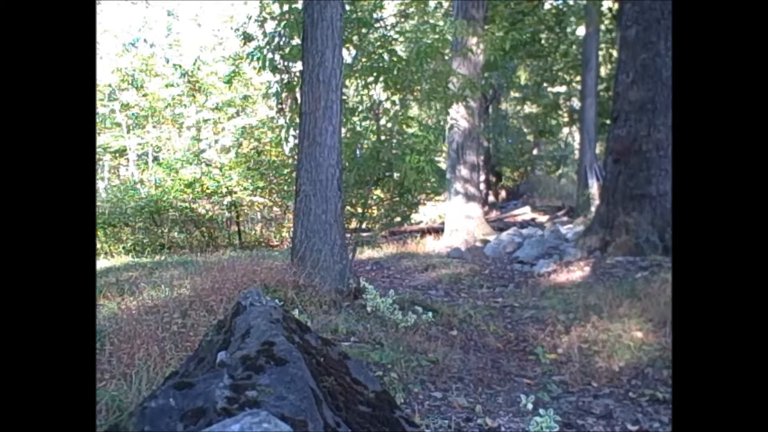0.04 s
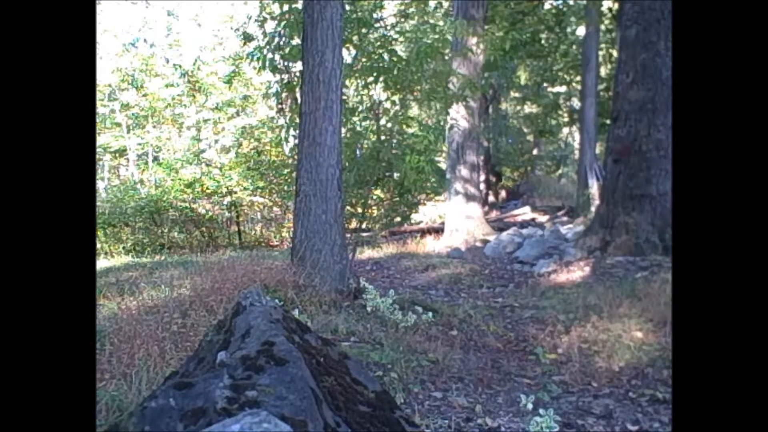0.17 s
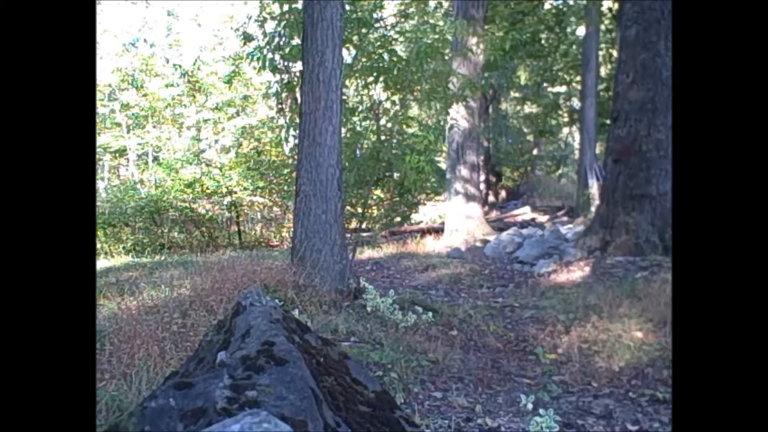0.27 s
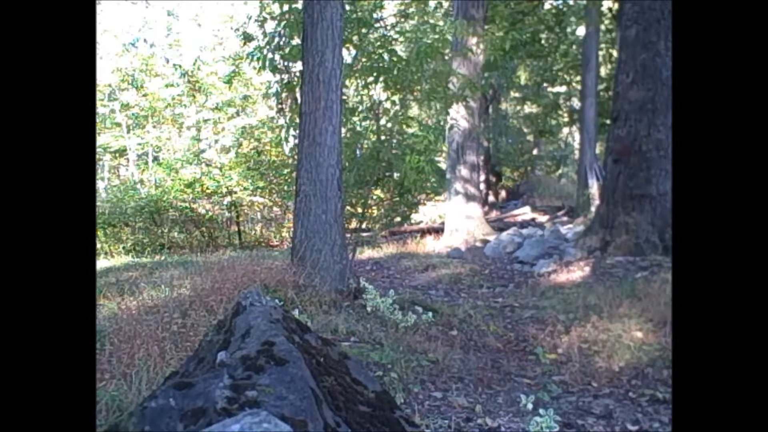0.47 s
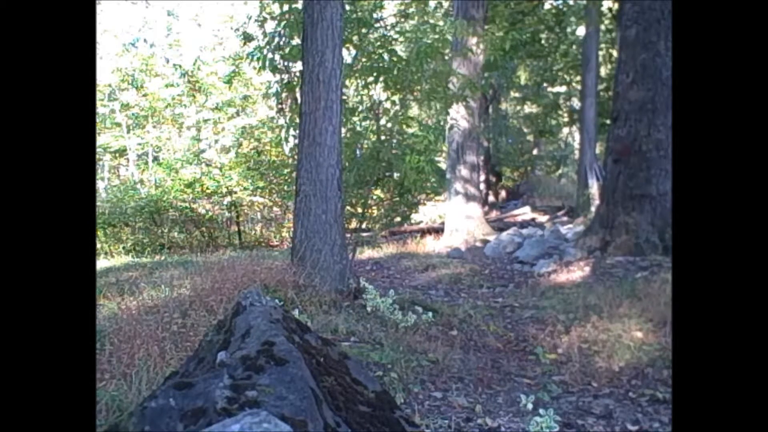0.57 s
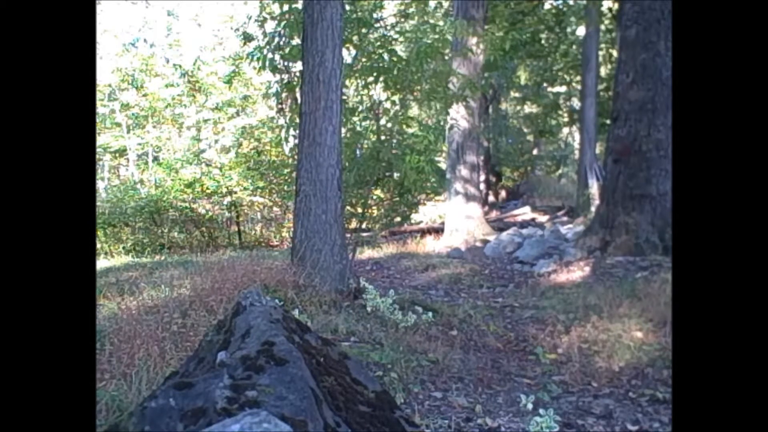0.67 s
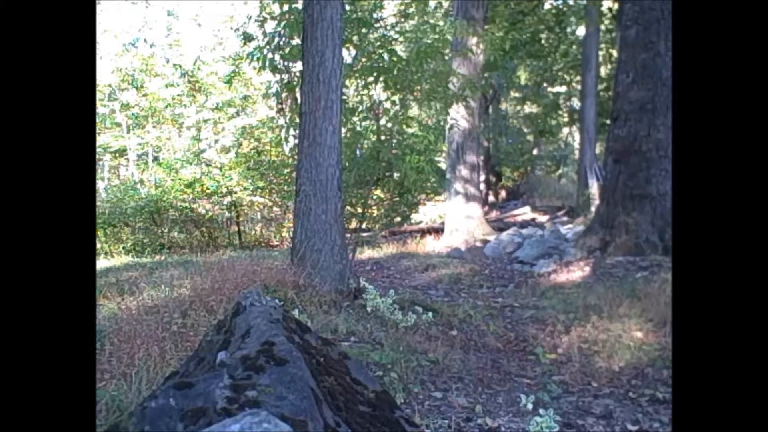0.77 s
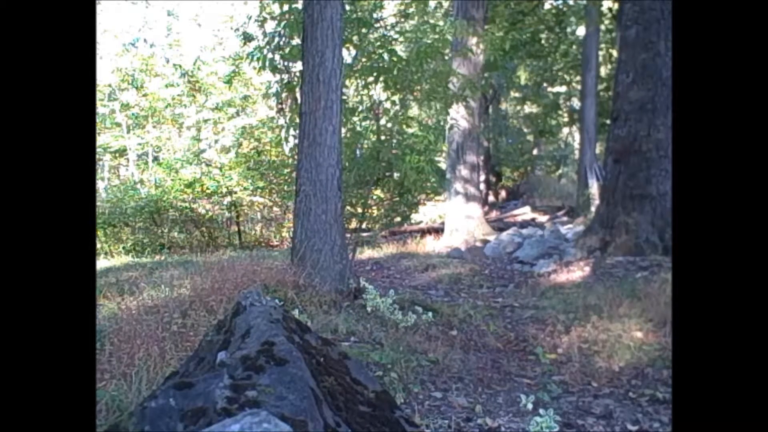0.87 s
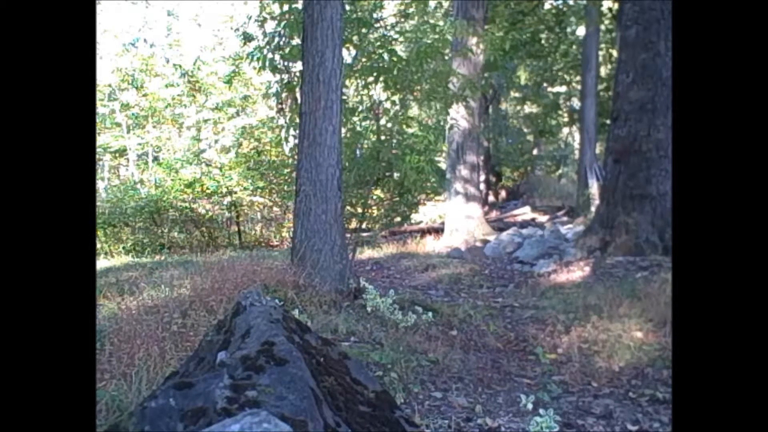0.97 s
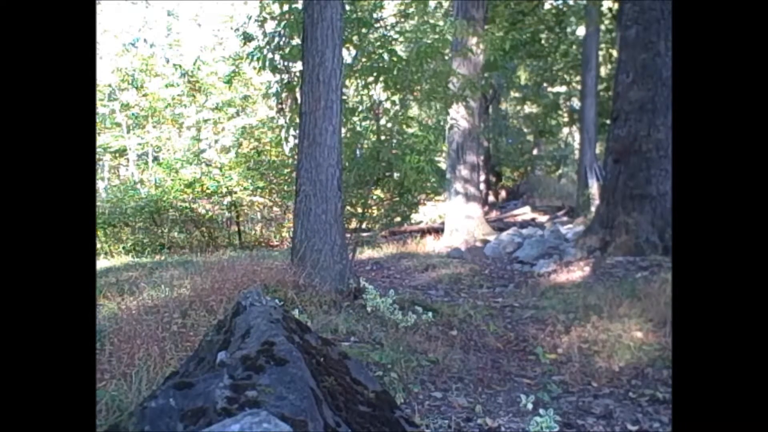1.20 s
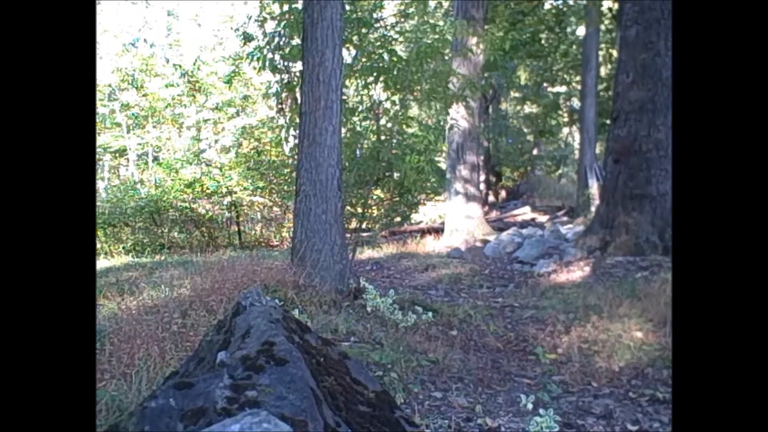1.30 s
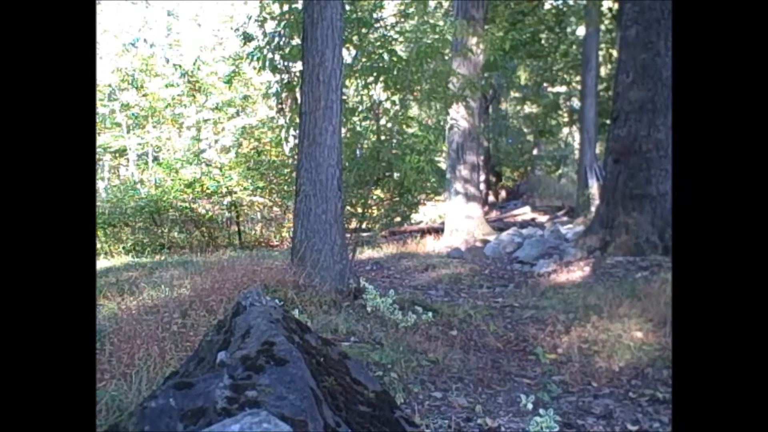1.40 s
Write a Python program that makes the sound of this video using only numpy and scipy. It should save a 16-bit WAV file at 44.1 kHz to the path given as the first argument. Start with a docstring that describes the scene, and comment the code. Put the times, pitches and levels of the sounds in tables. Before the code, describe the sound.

A chipmunk close to the microphone gives one sharp, high chip that plunges in pitch and echoes among the trees. A fainter, lower chip comes from farther off just before it and another later, over faint insects in a quiet wooded yard.

```python
"""Chipmunk in a wooded yard

Near the microphone a chipmunk gives one sharp chip, a pure whistle that arches up, plunges and
echoes among the trunks. Farther off, two lower chips and a bird's three soft hoots sound over a
steady insect chorus. Close by, small ticks and soft bumps lie on a faint outdoor rumble."""
import sys
import numpy as np
from scipy import signal
from scipy.fft import rfft, irfft, next_fast_len
from scipy.io import wavfile
from scipy.ndimage import uniform_filter1d, map_coordinates

SR = 44100
rng = np.random.default_rng(int(sys.argv[2]) if len(sys.argv) > 2 else 0)


def wrap_up_sound(samples):
    """Save the sound to the file named by the first command line argument, as 16-bit audio."""
    columns = np.atleast_2d(samples).T
    # keep every value between -1 and 1, then stretch to whole-number steps
    tamed = np.clip(columns, -1, 1)
    steps = np.round(tamed * 32767).astype(np.int16)
    wavfile.write(sys.argv[1], SR, steps)


N = 63945

# The near chip's glide. Each row: time in seconds, pitch in Hz.
NEAR_CHIP_PITCH = [(.202, 11390), (0.2103, 12760), (.22, 12390), (0.234, 11030), (.244, 9250), (.252, 8100),
                   (.259, 6920), (.264, 5480), (0.268, 4445)]
# Its loudness. Each row: time in seconds, level in dB.
NEAR_CHIP_LEVEL = [(0.201, -62), (0.203, -32.5), (.209, -30.5), (.214, -28), (.222, -27), (0.228, -24),
                   (0.242, -24), (.251, -21.5), (.259, -24.5), (0.261, -34.5), (0.2676, -34.5),
                   (0.2699, -50)]
# Brief dips in its direct sound. Each row: time in seconds, depth in dB.
NEAR_CHIP_DIPS = [(0.2088, 4), (0.2232, 12), (.237, 9), (0.266, 9.5)]
# Far chips. Each row: loudest moment in seconds, level in dB, lead-in in seconds.
FAR_CHIP_CALLS = [(0.138, -47.5, 0.01), (1.134, -45.5, 0.022)]
# Their shared shape. Each row: seconds from the loudest moment, pitch in Hz, relative level in dB.
FAR_CHIP_SHAPE = [(-.026, 7960, -18), (-.019, 7000, -11), (-.012, 5750, -14), (-.008, 4690, -4),
                  (-.004, 4380, -8), (0, 4300, 0.5), (.003, 3980, -7), (.009, 3120, -16.5),
                  (0.011, 2600, -28)]
# Distant hoots. Each row: start in seconds, level in dB, starting pitch in Hz.
BIRD_HOOTS = [(.325, -67, 1180), (0.813, -63.5, 1310), (1.314, -61, 1310)]
# A faint falling whistle. Each row: time in seconds, pitch in Hz, level in dB.
BIRD_WHISTLE = [(1.225, 3000, -80), (1.24, 2600, -71), (1.254, 2120, -69.5), (1.284, 2130, -88),
                (1.3, 2080, -77)]
# Ticks in the leaves. Each row: start in seconds, level in dB, centre in Hz, seconds to fade 60 dB.
LITTER_TICKS = [(0.755, -46.5, 3070, 0.038), (0.8127, -48, 4940, 0.043), (1.375, -48.5, 796, .025),
                (1.375, -48, 9100, 0.017)]
# Soft low bumps. Each row: start in seconds, level in dB.
LITTER_BUMPS = [(0.371, -54), (.873, -56.5), (0.881, -51)]
# Spectra of two insect bands and the open air. Each row: frequency in Hz, relative level in dB.
LOW_INSECT_SPECTRUM = [(3100, -27), (3400, -7.5), (3600, 2), (3800, -5), (4200, -7), (4700, -6.5),
                       (5300, -20), (6000, -40)]
HIGH_INSECT_SPECTRUM = [(5300, -22), (6400, -5), (7200, -2), (7900, 5), (8300, 2.5), (8700, -5),
                        (9200, -23), (11000, -26)]
AIR_SPECTRUM = [(20, -9), (35, 0.5), (48, 2.5), (70, -3), (120, -4), (250, -13), (500, -17.5),
                (1000, -21.5), (2500, -26), (6000, -26), (12000, -31), (16000, -27.5)]
# The length of the woods' echo. Each row: frequency in Hz, seconds to fade 60 dB.
ECHO_T60 = [(1500, 0.87), (4500, 0.5148), (8000, 0.4221), (12500, 0.3178)]
# Its colour. Each row: frequency in Hz, gain in dB.
ECHO_COLOUR = [(1500, -4.5), (4000, -2), (4800, 0.5), (6500, -1), (8000, -5.5), (10000, -1.5), (12500, 2.5)]


def near_chipmunk(dip_width_s=0.002, echo_db=-3.5):
    """One clean, plunging whistle near the microphone; the direct sound dips, the echo stays even."""
    chip = whistle(*np.transpose(NEAR_CHIP_PITCH), *np.transpose(NEAR_CHIP_LEVEL))
    dips_db = sum(depth * np.exp(-((clock() - at) / dip_width_s) ** 2) for at, depth in NEAR_CHIP_DIPS)
    return chip * amp(-dips_db) + amp(echo_db) * woods_echo(chip)


def far_chips(rough_db=2, rough_hz=90, octave_db=-17, echo_db=-1):
    """Lower, slightly rough chips with a weak octave, from deeper in the wood, about half echo."""
    shape_s, shape_hz, shape_db = np.transpose(FAR_CHIP_SHAPE)
    chips = np.zeros(N)
    for peak_s, level_db, lead_s in FAR_CHIP_CALLS:
        t = clock() - peak_s
        phase = phase_of(np.interp(t, shape_s, shape_hz) + rough_hz * wobble(700))
        gain = amp(level_db + np.interp(t, shape_s, shape_db) + rough_db * wobble(500))
        gate = np.clip((t + lead_s) / 0.0017, 0, 1) * (t < shape_s[-1])
        chips += np.sqrt(2) * gate * gain * (np.sin(phase) + amp(octave_db) * np.sin(2 * phase))
    return chips + amp(echo_db) * woods_echo(chips)


def distant_birds(hoot_s=0.115, arch_hz=297.6, waver_hz=14, echo_db=-4.5):
    """Three arched hoots and one falling whistle, far off among the trees."""
    times, hz, db = np.transpose(BIRD_WHISTLE)
    calls = whistle(times, hz, times, db)
    for start, level_db, base_hz in BIRD_HOOTS:
        progress = np.clip((clock() - start) / hoot_s, 0, 1)
        arch = np.abs(np.sin(np.pi * progress))
        pitch = base_hz + arch_hz * arch + waver_hz * wobble(150)
        calls += amp(level_db) * np.sqrt(arch) * np.sin(phase_of(pitch))
    return calls + amp(echo_db) * woods_echo(calls)


def leaf_litter():
    """Small dry ticks and dull bumps close to the microphone."""
    ticks = sum(amp(db) * burst(start, hz, q=0.92, t60=t60, attack_s=0.001)
                for start, db, hz, t60 in LITTER_TICKS)
    bumps = sum(amp(db) * burst(start, hz=95, q=1.4, t60=0.085, attack_s=0.0023)
                for start, db in LITTER_BUMPS)
    return ticks + bumps


def insects(level_db=-63.5, flutter_db=1, flutter_rate=45):
    """Massed crickets around the yard: two bands of noise, each fluttering a little."""
    return sum(amp(level_db + flutter_db * wobble(flutter_rate)) * noise(band)
               for band in (LOW_INSECT_SPECTRUM, HIGH_INSECT_SPECTRUM))


def open_air(level_db=-62):
    """The yard's faint, steady rumble and hiss."""
    return amp(level_db) * noise(AIR_SPECTRUM)


def woods_echo(x, delay_s=0.0064, build_s=0.0053):
    """Trunks and leaves scatter sound back to the microphone as a dense echo; treble fades first."""
    hz, t, spectra = signal.stft(rng.standard_normal(SR), SR, nperseg=256)
    fade = np.exp(-np.log(1000) * t / along(ECHO_T60, hz)[:, None])
    tail = signal.istft(spectra * fade, SR, nperseg=256)[1]
    age = np.maximum(np.arange(len(tail)) / SR - delay_s, 0)
    tail *= 1 - np.exp(-age / build_s)
    echo = signal.fftconvolve(x, tail / np.linalg.norm(tail))[:N]
    return filtered(echo, lambda f: amp(along(ECHO_COLOUR, f)))


def whistle(pitch_s, pitch_hz, level_s, level_db):
    """A pure tone that follows a pitch curve and a level curve."""
    t = clock()
    tone = np.sqrt(2) * np.sin(phase_of(np.interp(t, pitch_s, pitch_hz)))
    gate = (t >= level_s[0]) & (t <= level_s[-1])
    return tone * gate * amp(np.interp(t, level_s, level_db))


def burst(start, hz, q, t60, attack_s):
    """A dying puff of noise in one broad resonance."""
    age = np.maximum(clock() - start, 0)
    envelope = (1 - np.exp(-age / attack_s)) * np.exp(-np.log(1000) * age / t60)
    white = rng.standard_normal(N)
    band = filtered(white, lambda f: 1j * f * hz / q / (hz * hz - f * f + 1j * f * hz / q))
    return envelope * unit(band)


def noise(spectrum):
    """Coloured noise of rms 1."""
    return unit(filtered(rng.standard_normal(N), lambda hz: amp(along(spectrum, hz))))


def wobble(rate):
    """A smooth random curve, rate knots a second."""
    return map_coordinates(rng.standard_normal(2000), [clock() * rate], mode="wrap")


def filtered(x, response):
    """x shaped by a frequency response."""
    size = next_fast_len(N + SR // 2)
    return irfft(rfft(x, size) * response(np.fft.rfftfreq(size, 1 / SR)), size)[:N]


def along(points, hz):
    """Interpolate (Hz, value) points on a log frequency axis."""
    knots_hz, values = np.transpose(points)
    return np.interp(np.log(hz + 1), np.log(knots_hz + 1), values)


def phase_of(hz):
    """The running phase of a pitch curve, in radians."""
    return 2 * np.pi * np.cumsum(hz) / SR


def amp(db):
    """Decibels to gain."""
    return 10 ** (np.asarray(db) / 20)


def unit(x):
    """Scale to rms 1."""
    return x / np.sqrt(np.mean(x ** 2) + 1e-20)


def clock():
    """The time of each sample in seconds."""
    return np.arange(N) / SR


def scene():
    """The yard, near and far, as it reaches one microphone."""
    return (near_chipmunk() + far_chips() + distant_birds() + leaf_litter() + insects() + open_air())[None]


def record(dry, hiss_db=-18.5, top_hz=15790):
    """A thin hiss rides on loud, high sounds; nothing is heard above top_hz."""
    x = dry[0]
    slope = np.diff(x, prepend=0)
    steepness = np.sqrt(np.abs(uniform_filter1d(slope ** 2, size=64)))
    hiss = amp(hiss_db) * steepness * rng.standard_normal(N)
    return filtered(x + hiss, lambda hz: hz < top_hz)[None]


dry = scene()
out = record(dry)
wrap_up_sound(out)
```